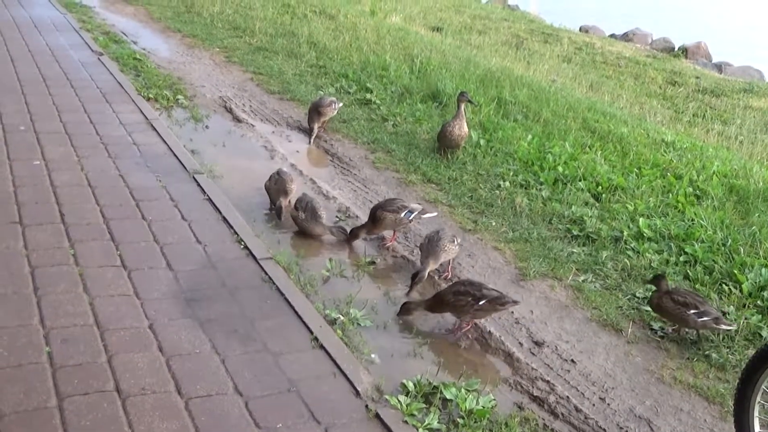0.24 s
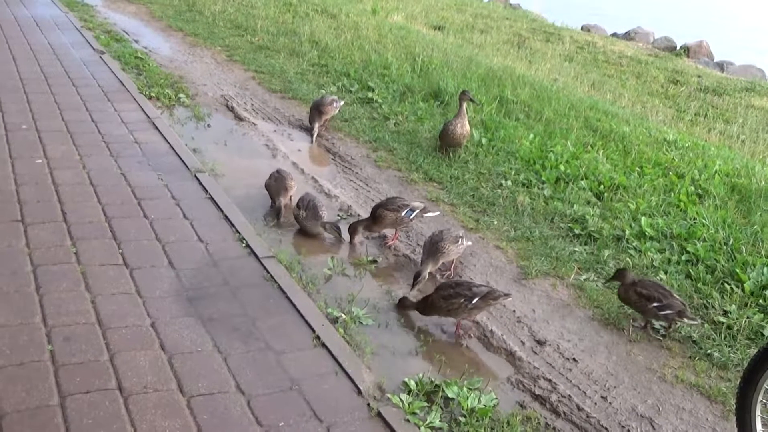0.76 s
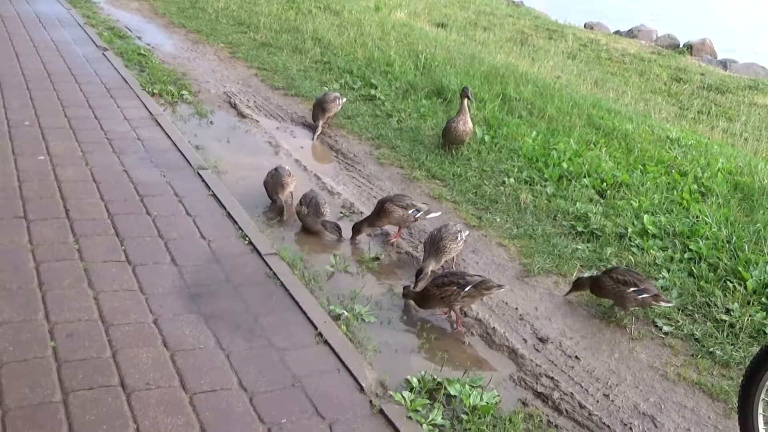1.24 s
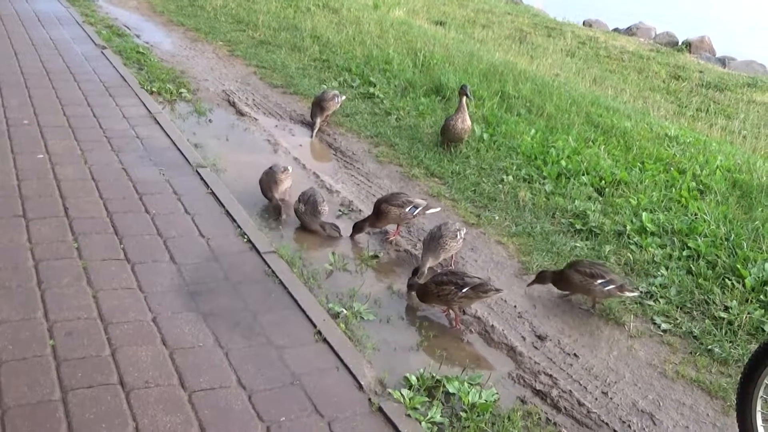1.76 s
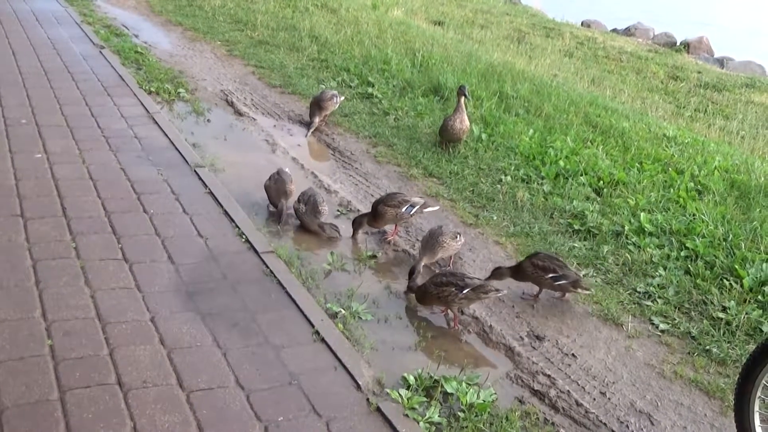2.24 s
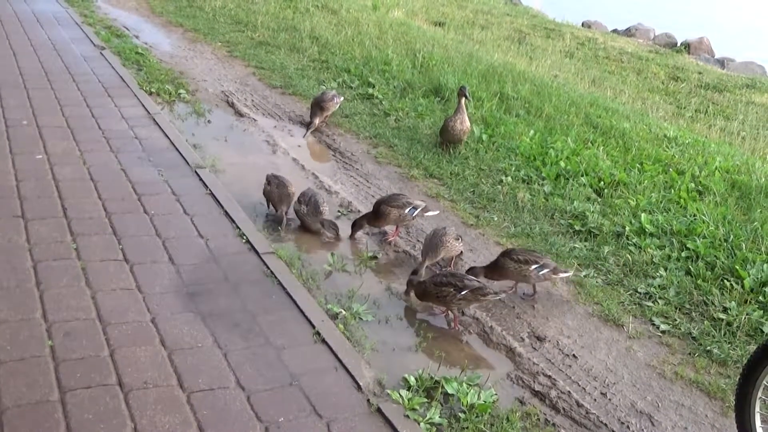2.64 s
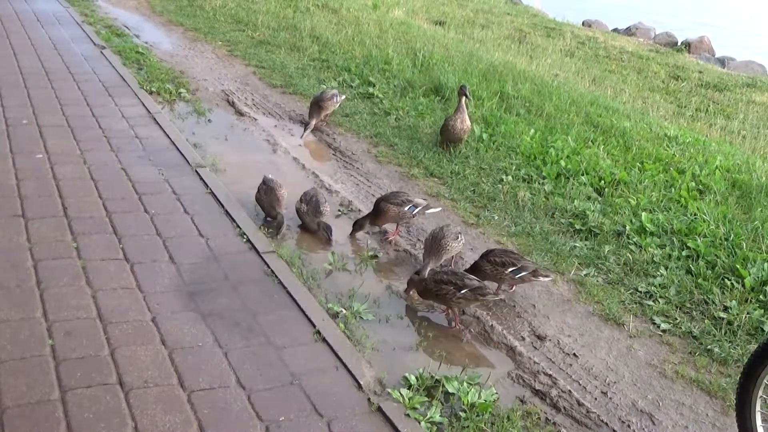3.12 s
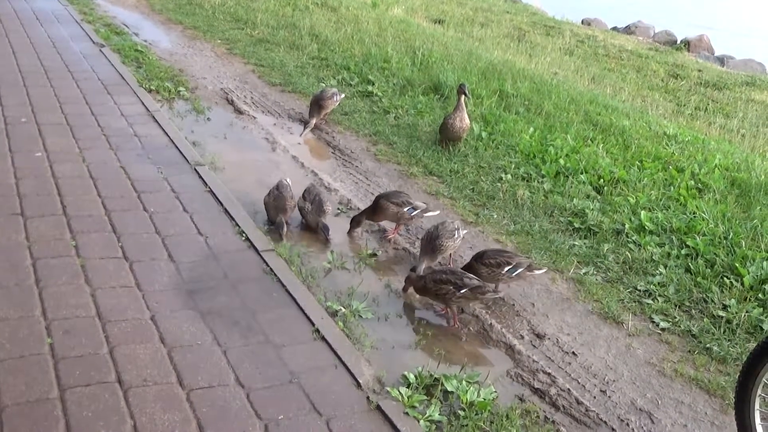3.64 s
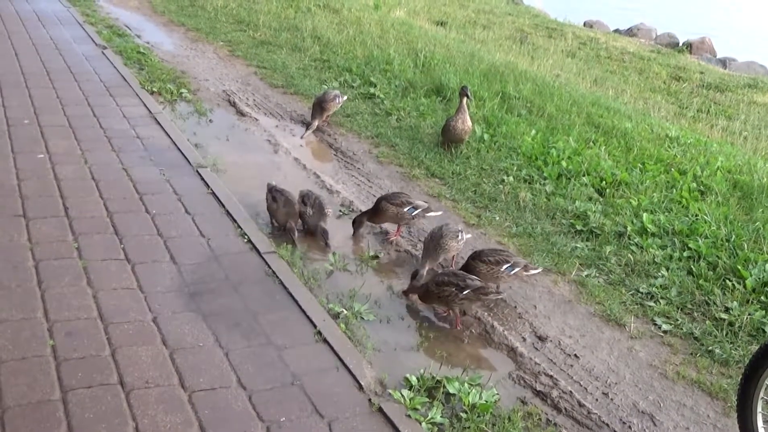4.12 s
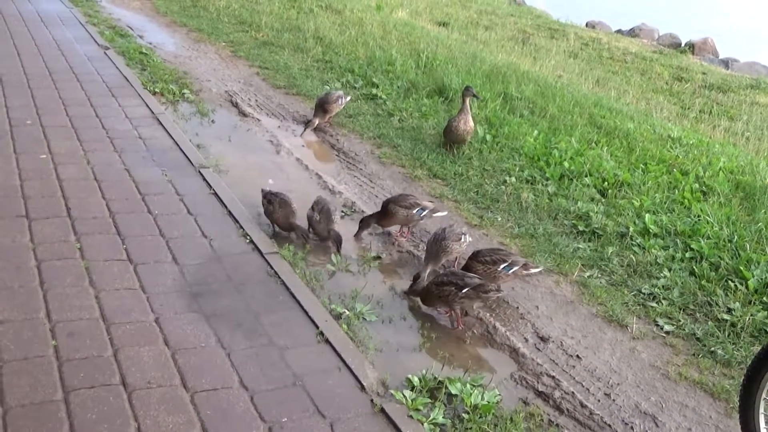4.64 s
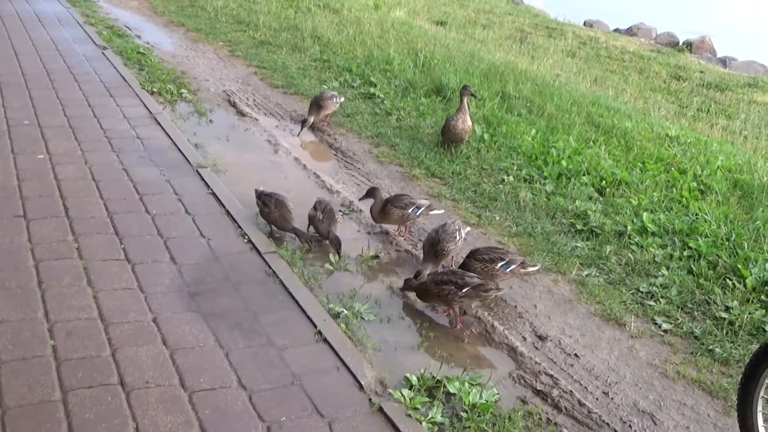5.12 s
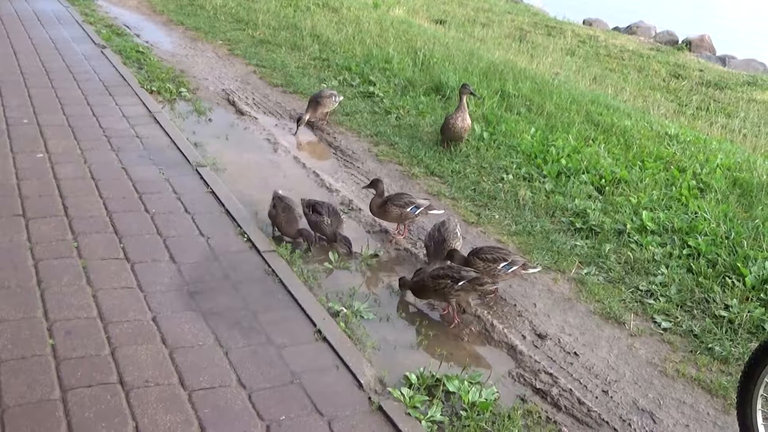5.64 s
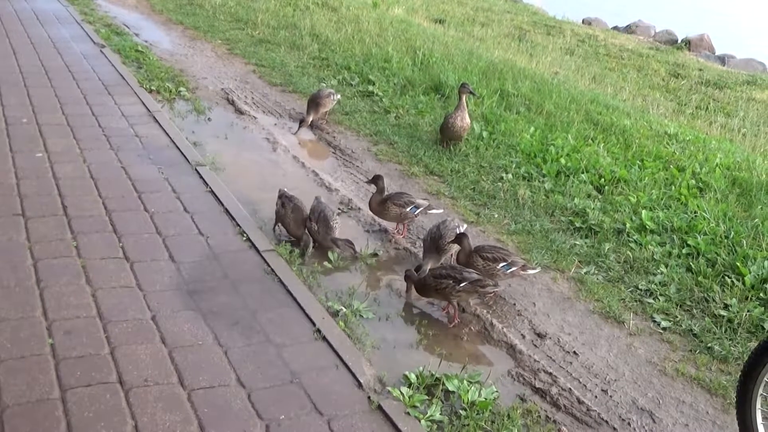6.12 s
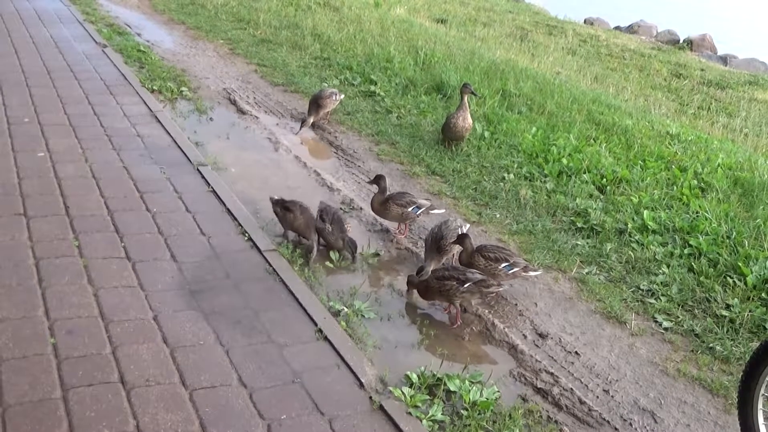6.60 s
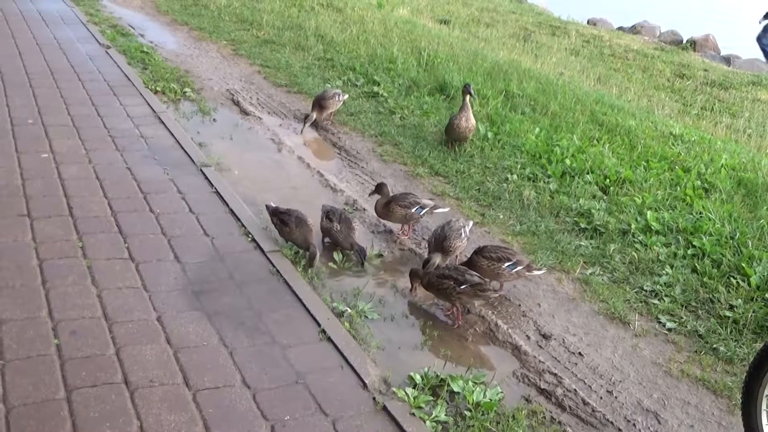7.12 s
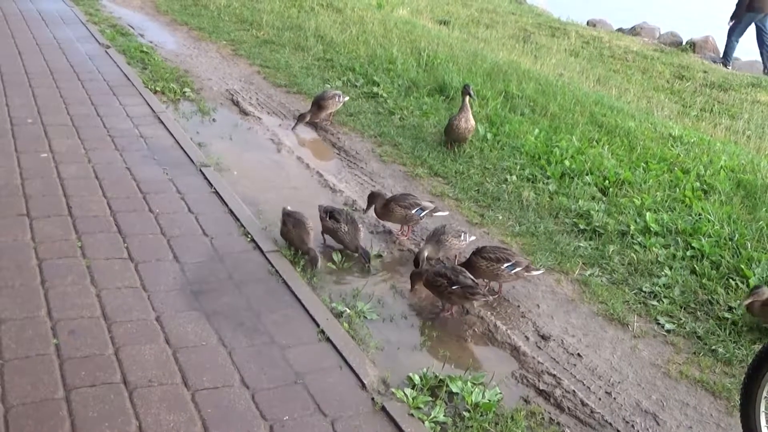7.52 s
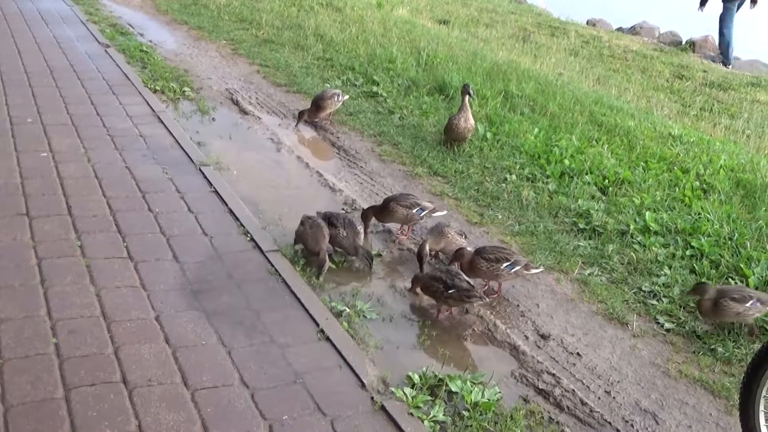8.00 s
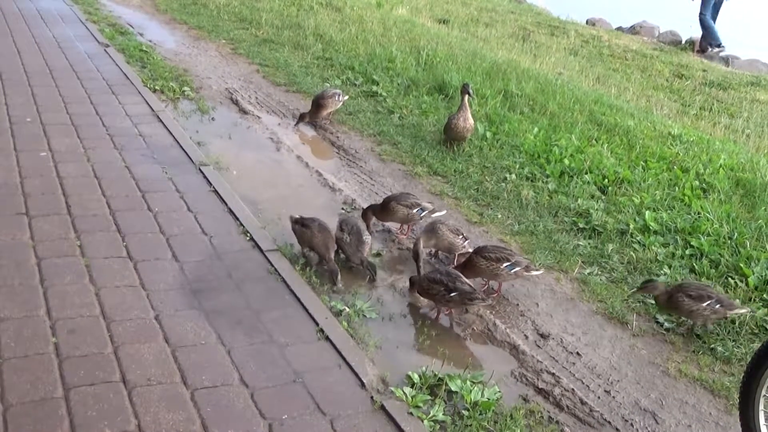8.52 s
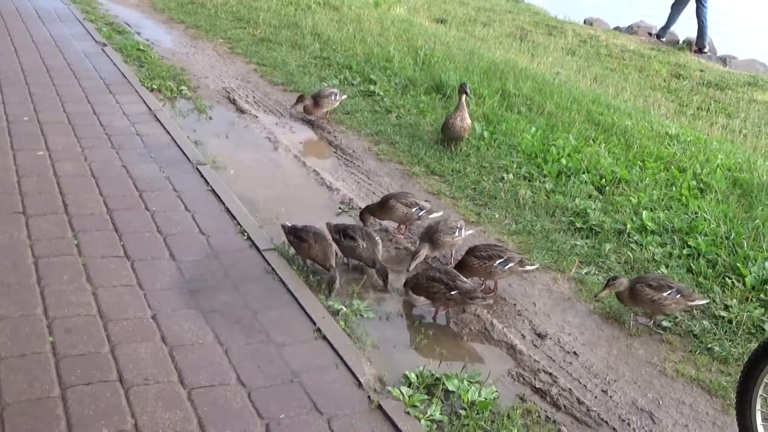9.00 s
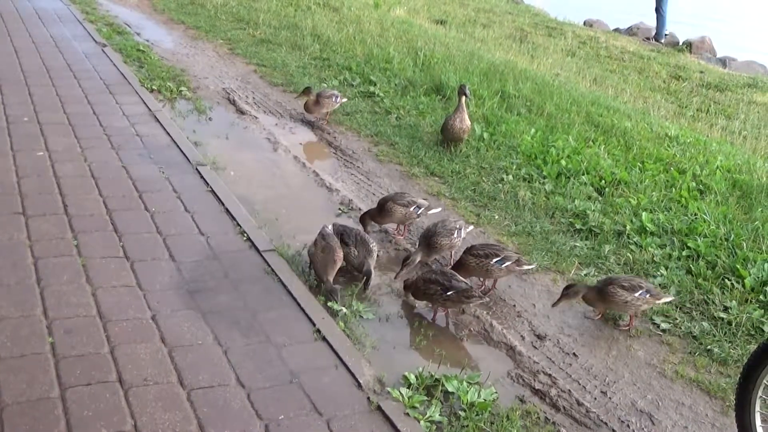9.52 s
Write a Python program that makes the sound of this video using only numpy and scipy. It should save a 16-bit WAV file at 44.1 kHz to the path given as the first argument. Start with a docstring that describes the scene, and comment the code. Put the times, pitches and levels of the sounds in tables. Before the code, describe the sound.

Ducks dabble in a muddy puddle, bills making rapid wet clicks and smacks, with tiny bubble plops and soft short peeps over faint open-air wash.

```python
"""On a lakeside path, ducks dabble in a rain puddle a few metres away.
Their bills click, smack and tick: bursts of crackling noise shaped by small wet hollows, some with a ringing bubble.
Bubbles and drips are short, fading tones. The ducks' soft peeps are wavering tones that arch or slide in pitch.
Underneath lie an open-air wash of coloured noise, nearly steady, and a faint hum of narrow-band noise."""
import sys
import numpy as np
from scipy import signal
from scipy.fft import rfft, irfft, next_fast_len
from scipy.io import wavfile
from scipy.ndimage import uniform_filter1d

SR = 44100
rng = np.random.default_rng(int(sys.argv[2]) if len(sys.argv) > 2 else 0)


def wav_out(sig):
    """Save sig, one row per channel (or a flat mono array), as 16-bit PCM at SR to the path in sys.argv[1]."""
    wavfile.write(sys.argv[1], SR, np.round(np.clip(np.atleast_2d(sig).T, -1, 1) * 32767).astype(np.int16))


N = 429975  # length of the scene in samples


def amp(db):
    """Turns decibels into a plain multiplier."""
    return 10 ** (np.asarray(db) / 20)


def evened(x):
    """Scales a sound to an average (rms) level of 1."""
    return x / np.sqrt(np.mean(x ** 2) + 1e-20)


def read(points, hz):
    """Reads a spectrum between its points, on a log-frequency axis."""
    f, value = np.transpose(points)
    return np.interp(np.log(hz + 1), np.log(f + 1), value)


def coloured(x, points):
    """Filters a sound by a spectrum in dB."""
    size = next_fast_len(len(x))
    gain = amp(read(points, np.fft.rfftfreq(size, 1 / SR)))
    return irfft(rfft(x, size) * gain, size)[:len(x)]


def add(mix, s, sound):
    """Mixes a sound in at time s (seconds), cutting off what runs past the end."""
    part = mix[max(round(s * SR), 0):][:len(sound)]
    part += sound[:len(part)]


def between(low, high, share):
    """A value between two others on a log scale; share runs from 0 to 1."""
    return low * (high / low) ** share


def air(level_db=-55, swell_db=-0.82):
    """Distant outdoor wash: coloured noise whose level drifts very slightly."""
    # Tone colour of the wash. Each row: frequency in Hz, relative level in dB.
    wash_colour = [(25, -33), (60, -13), (145, -6.5), (250, 1.5), (330, 0.5), (440, -3), (540, -3.5),
                   (760, 2.5), (1100, -1), (1600, -2), (2900, -5), (3600, -7.5), (6200, -11.5), (9700, -11),
                   (12300, -20), (16000, -24)]
    knots = np.linspace(0, N, 30)
    swell = np.interp(np.arange(N), knots, rng.standard_normal(len(knots)))
    wash = evened(coloured(rng.standard_normal(N), wash_colour))
    return amp(level_db + swell_db * swell) * wash


def drone(hz=346, width_hz=14, drone_db=-77):
    """A faint far-off hum: noise in so narrow a band that it sounds like a wavering tone."""
    f = np.fft.rfftfreq(N, 1 / SR)
    band = 1 / (1 + ((f - hz) / width_hz) ** 2)
    return amp(drone_db) * evened(irfft(rfft(rng.standard_normal(N)) * band, N))


def cavity(hz, q, size=1024):
    """Response of the small wet hollow between bill and mud: a resonance that never sounds early."""
    # Tone colour shared by all bill smacks. Each row: frequency in Hz, gain in dB.
    bill_colour = [(300, -0.5), (700, 4), (1500, 4), (2900, 4.5), (3450, -2.5), (4400, -1), (6200, -3.5),
                   (6800, 1.5), (7800, 0.5), (9900, 6.5), (12000, -4.5), (15500, -15.5)]
    f = np.fft.rfftfreq(size, 1 / SR) + 1
    resonance = 1 / (1 + (q * (f / hz - hz / f)) ** 2)
    log_gain = np.log(amp(read(bill_colour, f)) * resonance + 1e-4)
    # folding the cepstrum onto positive times makes the response minimum-phase
    cepstrum = irfft(log_gain)
    cepstrum[1:size // 2] *= 2
    cepstrum[size // 2 + 1:] = 0
    return np.exp(rfft(cepstrum))


def droplet(t, hz, ring_db=-5, cycles=7.3, lift=0.039):
    """A trapped bubble rings for a few cycles, rising a little in pitch."""
    age = t * hz / cycles
    rising_hz = hz * (1 + lift * np.tanh(age))
    tone = np.sin(2 * np.pi * np.cumsum(rising_hz) / SR)
    return amp(ring_db) * evened(tone * np.sqrt(age) * np.exp(-age))


def smack(hz, q, length, snap=2.54, onset=0.27, droplet_q=1.8, size=1024):
    """A water film parts and crackles away into the cavity; its energy is that of 1 ms at rms level 1."""
    t = np.arange(size) / SR
    decay = max(length, 1e-4)
    grit = evened(rng.standard_normal(size) * rng.exponential(1, size) ** 2)
    crackle = grit * np.exp(-t / decay) * (1 - np.exp(-t / (onset * decay)))
    crackle[0] += snap  # the film snaps
    sound = evened(irfft(rfft(crackle) * cavity(hz, q)))
    if q > droplet_q:  # a tight hollow also traps a bubble
        sound = sound + droplet(t, hz)
    return evened(sound) * np.sqrt(SR / 1000 / size)


def effort_db(s, usual_db=-55.5):
    """How far the feeding is above its unhurried level at time s."""
    # How hard the flock feeds. Each row: time in seconds, level of the dabbling in dB.
    feeding = [(0.0, -56.5), (0.71, -54), (0.84, -54), (1.6, -55.5), (2.33, -53), (2.55, -53), (3.47, -51),
               (3.83, -55.5), (4.02, -52), (4.91, -58.5), (5.32, -54.5), (6.38, -54), (6.76, -58.5),
               (7.96, -57.5), (8.12, -53), (8.28, -54), (9.01, -57.5), (9.75, -53)]
    return np.interp(s, *np.transpose(feeding)) - usual_db


def patter(level_db, follow, low_hz, high_hz, per_s, spread_db, q, length, count=28):
    """Countless tiny smacks, each kind with its own cavity; a few are much larger than the rest."""
    out = np.zeros(N)
    seconds = N / SR
    for hz in np.geomspace(low_hz, high_hz, count):
        grain = smack(hz, q * rng.uniform(0.49, 2.1), length * rng.uniform(0.29, 2.3))
        when, chance, luck = rng.random((3, 400))
        heard = chance < per_s * seconds / count / len(chance)
        size_db = spread_db * np.minimum(-np.log(luck), 3)  # mostly small, seldom large
        for s, db in zip(when[heard] * seconds, size_db[heard]):
            # follow: dB of level for each dB of feeding effort
            add(out, s, amp(level_db + db + follow * effort_db(s)) * grain)
    return out


def dabbling():
    """Water slurps through the bills; mud ticks higher up. Both grow louder with the feeding."""
    slurps = patter(level_db=-58.0, follow=1.4, low_hz=1030, high_hz=4620,
                    per_s=240, spread_db=3.0, q=1.26, length=0.0012)
    ticks = patter(level_db=-60.0, follow=0.67, low_hz=3770, high_hz=13100,
                   per_s=130, spread_db=4.5, q=1.3, length=0.0018)
    return slurps + ticks


def plop(hz, swell_s=0.00081):
    """A pocket of air swells and rings for a few cycles in the water."""
    t = np.arange(SR // 50) / SR
    swell = t / swell_s * np.exp(1 - t / swell_s)
    ring = swell * np.sin(2 * np.pi * hz * t)
    return np.gradient(ring) * SR / (2 * np.pi * hz)  # only changing flow radiates


def plops(plop_db=3.5):
    """The loudest bubbles in the puddle, each a ringing pocket of air."""
    # Each row: start in seconds, level in dB before the shared boost plop_db, pitch in Hz.
    bubbles = [(0.017, -43, 2820), (0.1354, -41, 3030), (0.4956, -39.5, 2110), (0.842, -45, 2550),
               (1.044, -47, 2100), (1.1805, -42.5, 2740), (1.6133, -39, 1730), (1.706, -42.5, 3080),
               (1.841, -43, 2830), (1.978, -44, 2830), (2.609, -42, 1600), (2.959, -42, 1760),
               (3.197, -39, 1700), (3.9357, -39.5, 2760), (4.02, -45, 3000), (4.146, -42.5, 3000),
               (4.261, -44, 1150), (4.318, -47, 730), (5.096, -40, 775), (5.992, -46, 3050),
               (6.148, -40, 3000), (6.35, -44, 3300), (6.716, -37.5, 4300), (7.037, -42, 2800),
               (7.172, -40.5, 720), (7.172, -46, 480), (8.1045, -38, 1450), (8.158, -42.5, 2450),
               (8.339, -43, 2130), (8.571, -49, 520), (9.197, -41.5, 2840), (9.6536, -41, 4370)]
    out = np.zeros(N)
    for s, db, hz in bubbles:
        add(out, s, amp(db + plop_db) * plop(hz))
    return out


def froth(length, froth_db=-12, full_s=0.007, linger=2.8, low_hz=1500, high_hz=10000,
          burst_s=0.0004, count=8):
    """The longer a smack, the more small bubbles burst in its wake, each at its own pitch."""
    out = np.zeros(SR // 10)
    for chance, delay, small in rng.random((count, 3)):
        if chance < length / full_s:
            bubble = plop(between(low_hz, high_hz, small), burst_s)
            add(out, linger * length * delay, amp(froth_db) * bubble)
    return out


def bills(click_db=-0.47):
    """The distinct clicks of the nearest bills: water films part in wet hollows, leaving froth."""
    # The loudest clicks. Each row: start in seconds, energy level in dB before the shared trim click_db,
    # cavity pitch in Hz, cavity sharpness Q (no unit), fading time in seconds (at least 0.0001 is used).
    clicks = [(0.0181, -39.5, 5700, 0.25, 0.0011), (0.0368, -40, 5500, 0.22, 0.0028),
              (0.1354, -37, 2060, 0.21, 0.0021), (0.203, -30, 8000, 0.15, 0.00094),
              (0.214, -36, 11500, 0.65, 0.0003), (0.348, -39, 4600, 1.2, 0.0005),
              (0.371, -37.5, 4800, 0.3, 0.0005), (0.491, -37, 6500, 3, 0.0012),
              (0.763, -38.5, 4000, 0.75, 0.00083), (0.788, -36.5, 11000, 1.3, 0.0007),
              (0.839, -37, 4070, 0.23, 0.0022), (0.9, -39.5, 4570, 3, 0.0006),
              (1.066, -45, 6800, 4.4, 0.0006), (1.161, -38.5, 4800, 1.7, 0.0015),
              (1.217, -40.5, 11500, 0.24, 0.00097), (1.291, -41, 6900, 2.7, 0.00072),
              (1.371, -37, 2840, 4.5, 0.0025), (1.423, -36, 2450, 1.8, 0.00078),
              (1.441, -38, 8450, 2.4, 0.0005), (1.528, -42, 8180, 3, 0.0005),
              (1.612, -43, 1900, 0.5, 0.0015), (1.693, -45, 6600, 1, 0.00024),
              (1.708, -28, 6690, 0.4, 0.0027), (1.842, -39, 2100, 0.52, 0.0012),
              (1.937, -40, 4200, 1, 0.00056), (2.04, -36.5, 10300, 4.3, 0.00054),
              (2.2203, -28, 5800, 0.33, 0.00098), (2.403, -40, 2100, 0.26, 0.0018),
              (2.4097, -33, 1750, 0.35, 0.0021), (2.4499, -34, 2580, 1.3, 0.00058),
              (2.4667, -38, 4400, 1.7, 0.00094), (2.544, -41.5, 4000, 1.4, 0.0014),
              (2.606, -34.5, 3100, 0.18, 0.0058), (2.62, -39, 7200, 2.2, 0.0006),
              (2.665, -30, 6200, 1.7, 0.0023), (2.698, -31, 4660, 0.29, 0.0035),
              (2.8112, -39, 11500, 0.72, 0.001), (2.8674, -20.5, 7660, 0.16, 0.0024),
              (2.964, -33, 6110, 0.29, 0.0014), (2.982, -39, 6000, 1, 0.0011),
              (3.011, -32.5, 4260, 0.18, 0.0037), (3.0254, -37.5, 4200, 1.1, 0.0004),
              (3.09, -32.5, 8390, 0.58, 0.0035), (3.119, -41, 10400, 3, 0.0007),
              (3.13, -39, 2500, 0.3, 0.0014), (3.137, -31, 8700, 1.9, 0.0005),
              (3.14, -37, 3000, 0.3, 0.0012), (3.147, -35, 9200, 1.2, 0.0045),
              (3.185, -41, 5500, 0.5, 0.001), (3.1898, -29, 3300, 0.15, 0.0032),
              (3.199, -37, 6700, 4, 0.001), (3.2073, -31, 9300, 3.5, 0.0005), (3.21, -30, 5800, 4.4, 0.002),
              (3.214, -37, 9500, 1, 0.003), (3.239, -39, 5700, 1.2, 0.0014), (3.253, -34, 2830, 0.2, 0.005),
              (3.295, -32, 2400, 0.43, 0.00072), (3.312, -22.5, 7540, 1.3, 0.0014),
              (3.372, -29.5, 7100, 1.9, 0.0013), (3.4355, -25.5, 9500, 0.98, 0.0014),
              (3.4947, -40.5, 4800, 2.5, 0.0008), (3.499, -31.5, 9100, 0.9, 0.0007),
              (3.504, -27.5, 7950, 0.91, 0.0039), (3.5094, -29.5, 8000, 0.9, 0.0012),
              (3.5225, -35, 4800, 1.7, 0.0012), (3.5523, -35.5, 7200, 0.78, 0.00096),
              (3.6057, -23.5, 7500, 1, 0.0022), (3.61, -32, 6000, 0.2, 0.0009),
              (3.64, -39, 6900, 8, 0.0012), (3.662, -36, 6900, 2.8, 0.0007),
              (3.722, -30, 4400, 0.47, 0.0014), (3.7665, -37, 6000, 0.34, 0.0023),
              (3.8005, -31.5, 10500, 0.27, 0.0014), (3.8798, -16.5, 9300, 2.5, 0.00017),
              (3.933, -34, 9800, 2.3, 0.00099), (3.986, -33, 9250, 4.2, 0.00054),
              (4.002, -35, 4660, 0.21, 0.0082), (4.0479, -36.5, 4980, 0.3, 0.0012),
              (4.078, -36, 2300, 0.41, 0.001), (4.083, -41, 10080, 3, 0.0005),
              (4.104, -40, 2500, 1.2, 0.001), (4.109, -28, 9000, 3.7, 0.0012),
              (4.134, -37, 6600, 0.18, 0.0022), (4.1704, -30.5, 6830, 4, 0.0027),
              (4.198, -28.5, 5580, 0.28, 0.001), (4.259, -39, 1800, 0.18, 0.002),
              (4.261, -37, 5170, 4.5, 0.001), (4.373, -34, 1800, 0.16, 0.0017),
              (4.702, -36.5, 4450, 0.2, 0.0015), (4.734, -35, 8950, 1.6, 0.00051),
              (4.81, -35.5, 3720, 0.15, 0.0045), (4.928, -36, 1500, 0.25, 0.0028),
              (4.992, -36, 4660, 1.3, 0.0019), (5.0165, -44, 4300, 4, 0.0009),
              (5.117, -35.5, 4260, 0.33, 0.0026), (5.1547, -31, 4160, 1.8, 0.00088),
              (5.337, -36.5, 5240, 1.5, 0.0019), (5.4655, -42, 4940, 0.75, 0.00058),
              (5.472, -40.5, 4800, 4.5, 0.0008), (5.519, -34.5, 1890, 0.35, 0.00084),
              (5.585, -38, 2100, 0.79, 0.0008), (5.6224, -42.5, 6980, 4, 0.0007),
              (5.69, -30, 8950, 1.7, 0.00023), (5.71, -34.5, 5300, 1.3, 0.0025),
              (5.723, -36, 6300, 0.6, 0.00058), (5.743, -36.5, 9600, 0.18, 0.0012),
              (5.8079, -39.5, 2600, 0.19, 0.0018), (5.903, -34.5, 8390, 0.53, 0.00053),
              (5.9914, -43, 3300, 0.49, 0.0013), (6.035, -38.5, 5580, 0.61, 0.0051),
              (6.095, -38, 7940, 2.1, 0.0016), (6.128, -39, 1500, 0.38, 0.0012),
              (6.202, -37.5, 5840, 1.8, 0.0017), (6.367, -34.5, 9700, 0.86, 0.00033),
              (6.446, -32, 6460, 2.9, 0.0013), (6.5073, -36, 3100, 0.37, 0.0016),
              (6.514, -38, 10200, 2.4, 0.0005), (6.5527, -40, 5550, 1.8, 0.0012),
              (6.57, -36.5, 10050, 1.2, 0.0025), (6.717, -32, 6450, 0.98, 0.0014),
              (6.776, -33, 8950, 1.7, 0.0027), (7.032, -29, 9700, 2.1, 0.0011),
              (7.0375, -35.5, 5840, 0.38, 0.0025), (7.232, -39.5, 4600, 1, 0.0017),
              (7.258, -36.5, 11500, 0.3, 0.0013), (7.3633, -27.5, 6160, 0.86, 0.0005),
              (7.366, -27, 7500, 2, 0.0022), (7.396, -30, 7800, 6, 0.0017),
              (7.4685, -33.5, 8150, 4.2, 0.0019), (7.767, -38.5, 4000, 2.3, 0.0006),
              (7.858, -37.5, 6900, 5.4, 0.0012), (7.928, -36.5, 6110, 0.47, 0.0014),
              (7.9844, -34, 7900, 3.4, 0.001), (8.038, -36, 9050, 1.6, 0.0027),
              (8.07, -41, 4500, 1.8, 0.001), (8.1, -30, 5500, 1.3, 0.00067),
              (8.1305, -32, 4300, 0.69, 0.0018), (8.226, -40.5, 3600, 1, 0.0007),
              (8.183, -39.5, 10500, 0.3, 0.001), (8.323, -36, 3600, 2.3, 0.0028),
              (8.396, -43, 4200, 2.2, 0.0011), (8.51, -40, 9300, 2.5, 0.0006),
              (8.553, -36.5, 2590, 0.17, 0.0058), (8.61, -37, 5200, 2.1, 0.0018),
              (8.902, -38.5, 10000, 3, 0.0013), (8.992, -39, 4400, 1.2, 0.0023),
              (9.357, -35.5, 6690, 0.21, 0.0025), (9.3993, -37, 11500, 0.92, 0.0003),
              (9.435, -32.5, 3400, 0.62, 0.0015), (9.543, -38.5, 3300, 1.7, 0.0012),
              (9.5605, -39.5, 7900, 1.4, 0.0007), (9.6237, -29.5, 7940, 0.35, 0.0019),
              (9.6496, -39, 8780, 4, 0.0006)]
    out = np.zeros(N)
    for s, db, hz, q, length in clicks:
        add(out, s, amp(db + click_db) * smack(hz, q, length))
        add(out, s, amp(db) * froth(length))
    return out


def moments(per_s, follow, count=1500):
    """Random times, each with three random shares 0-1; follow above 0 crowds them when feeding is harder."""
    rows = rng.random((count, 5))
    s = rows[:, 0] * N / SR
    rate = per_s * amp(follow * effort_db(s))
    happens = rows[:, 1] < rate * N / SR / count
    return np.column_stack([s, rows[:, 2:]])[happens]


def nibbles(per_s=11, follow=0.8, nibble_db=-46, range_db=4, low_hz=3000, high_hz=11500,
            dull_q=0.46, sharp_q=3.2, long_s=0.0033, short_s=0.00056):
    """Softer bill clicks: smaller hollows sound higher and tend to be purer and shorter."""
    out = np.zeros(N)
    for s, strength, small, shape in moments(per_s, follow):
        tight = (small + shape) / 2
        hz = between(low_hz, high_hz, small)
        click = smack(hz, between(dull_q, sharp_q, tight), between(long_s, short_s, tight))
        add(out, s, amp(nibble_db + range_db * (strength + 0.5)) * click)
    return out


def gurgles(per_s=6, follow=1.6, gurgle_db=-49, range_db=5, low_hz=1200, high_hz=4600,
            gap_s=0.009, count=3):
    """Water drips off a lifted bill in short runs of little ringing bubbles."""
    out = np.zeros(N)
    for s, strength, *_ in moments(per_s, follow):
        for k, (delay, small) in enumerate(rng.random((count, 2))):
            drip = plop(between(low_hz, high_hz, small), swell_s=0.0006)
            add(out, s + gap_s * (k + delay), amp(gurgle_db + range_db * strength) * drip)
    return out


def peep(length, pitches, waver=0.016, second_db=-19, fullness=0.27, flutter_db=2.0,
         rough=0.29, echo_db=-12):
    """A thin, wavering, hoarse whistle gliding through three pitches, blurred by its bounce off the ground."""
    u = np.linspace(-1, 1, int(length * SR))
    # slow and faster random wobbles, made by smoothing noise
    jitter = evened(uniform_filter1d(rng.standard_normal(SR // 4), size=130))[:len(u)]
    rasp = evened(uniform_filter1d(rng.standard_normal(SR // 4), size=40))[:len(u)]
    hz = np.polyval(np.polyfit([-1, 0, 1], pitches, 2), u)  # a smooth curve through the pitches
    phase = 2 * np.pi * np.cumsum(hz * (1 + waver * jitter)) / SR
    tone = np.sin(phase) + amp(second_db) * np.sin(2 * phase)
    fade = signal.windows.cosine(len(u)) ** fullness
    effort = fade * amp(flutter_db * jitter)  # louder as the wavering lifts the pitch
    call = effort * tone * (1 + rough * rasp)
    lag = int(rng.uniform(0.001, 0.005035) * SR)  # the bounce comes 1 to 5 ms later
    return np.pad(call, (0, lag)) + amp(echo_db) * np.pad(call, (lag, 0))


def peeps(peep_db=-0.6):
    """Several ducks call in gliding whistles, often across one another."""
    # Each row: start in seconds, length in seconds (before the bounce), level in dB before the shared
    # trim peep_db, then the pitch at the start, in the middle and at the end in Hz (before wavering).
    calls = [(0.351, 0.04, -52, 950, 1110, 1650), (0.421, 0.046, -53.0, 1330, 1510, 1210),
             (0.434, 0.035, -58, 2260, 2320, 2080), (0.63, 0.043, -52, 1250, 1456, 1400),
             (0.807, 0.042, -49.5, 1310, 1560, 1340), (0.812, 0.05, -56, 2360, 2360, 2190),
             (0.85, 0.035, -55.5, 1640, 1680, 1470), (0.971, 0.06, -52, 1584, 1670, 1100),
             (0.985, 0.027, -55, 1660, 1870, 2150), (1.653, 0.048, -56, 3590, 3900, 3580),
             (1.698, 0.045, -52, 1416, 1550, 1390), (1.89, 0.037, -58, 1400, 1480, 1400),
             (2.089, 0.047, -46, 897, 1650, 1100), (2.379, 0.046, -48, 1040, 1606, 1140),
             (2.662, 0.069, -52, 1510, 1690, 1410), (2.857, 0.0345, -48, 1550, 1934, 2060),
             (3.361, 0.037, -47.5, 1397, 1365, 1130), (3.576, 0.04, -52.5, 1780, 1920, 1560),
             (4.036, 0.03, -49, 610, 1107, 1310), (4.061, 0.058, -49, 1310, 1480, 950),
             (4.145, 0.047, -52, 1750, 1850, 1350), (4.354, 0.052, -46.5, 1500, 1880, 1480),
             (4.566, 0.049, -52, 1595, 1850, 1510), (4.961, 0.024, -51, 1770, 2090, 2440),
             (5.145, 0.038, -48.5, 1520, 1620, 1510), (5.242, 0.04, -48, 1620, 1850, 1440),
             (5.492, 0.031, -50.0, 883, 1136, 1530), (5.794, 0.043, -54, 1384, 1560, 1350),
             (5.877, 0.031, -53, 1690, 1675, 1480), (5.968, 0.038, -53, 1280, 1405, 1330),
             (5.972, 0.035, -59, 2210, 2250, 2170), (6.07, 0.05, -49, 1550, 1840, 1470),
             (6.116, 0.055, -49.5, 987, 1150, 860), (6.16, 0.033, -53, 1300, 1420, 1440),
             (6.155, 0.04, -56, 2040, 2140, 2130), (6.298, 0.033, -50, 1740, 1670, 1430),
             (6.352, 0.04, -58, 2060, 2210, 2120), (6.353, 0.039, -53.0, 1250, 1410, 1220),
             (6.369, 0.045, -55, 930, 922, 750), (6.513, 0.042, -49.5, 1634, 1740, 1460),
             (6.88, 0.045, -60, 1780, 1600, 1570), (6.95, 0.033, -54.5, 1300, 1490, 1520),
             (7.053, 0.038, -53.5, 1500, 2020, 2170), (7.072, 0.035, -53.5, 1300, 1535, 1190),
             (7.17, 0.055, -58, 1364, 1850, 1120), (7.235, 0.088, -56, 1755, 2180, 2050),
             (7.258, 0.034, -50.5, 1455, 1470, 1260), (7.298, 0.053, -53.5, 1600, 1780, 1310),
             (7.428, 0.073, -56.5, 1920, 2160, 2240), (7.43, 0.052, -52.5, 1310, 1540, 1140),
             (7.53, 0.05, -48.5, 1500, 1950, 1270), (7.604, 0.063, -56, 1820, 2110, 2250),
             (7.612, 0.047, -50, 1430, 1580, 1330), (8.171, 0.046, -54, 940, 1003, 820),
             (8.276, 0.044, -50.5, 1680, 1696, 1300), (8.487, 0.053, -48, 1565, 1740, 1380),
             (8.549, 0.041, -55, 1550, 1540, 1240), (8.705, 0.042, -55, 1840, 1940, 1910),
             (9.458, 0.055, -53.5, 1680, 1630, 1300), (9.667, 0.064, -50.5, 1710, 2110, 1380),
             (9.69, 0.028, -59, 4300, 4120, 3700), (9.696, 0.037, -54, 930, 863, 940)]
    out = np.zeros(N)
    for s, length, db, *pitches in calls:
        add(out, s, amp(db + peep_db) * peep(length, pitches))
    return out


def far_peeps(per_s=4, far_db=-60.0, length=0.033, low_hz=1300, high_hz=2400, droop=0.161):
    """Fainter arched whistles from the rest of the flock, half lost in the wash."""
    out = np.zeros(N)
    for s, pitch, rise, fall in moments(per_s, follow=0):
        arch = 1 - droop * np.array([rise, 0, fall])  # lower at both ends
        add(out, s, amp(far_db) * peep(length, between(low_hz, high_hz, pitch) * arch))
    return out


def scatter(x, decay):
    """Brief scatter from paving, mud and grass: a noise tail that builds up, then fades."""
    t = np.arange(SR // 8) / SR
    tail = rng.standard_normal(len(t)) * np.sqrt(t) * np.exp(-t / decay)
    return signal.oaconvolve(x, tail / np.linalg.norm(tail))[:N]


def scene(scatter_db=-17, spread_db=-5, left_db=0.5):
    """The ducks are nearly straight ahead; side sound, opposite in the two ears, widens wash and scatter."""
    # Stereo width. Each row: frequency in Hz, gain of the side sound in dB.
    width = [(30, -11), (70, -15), (180, -29.5), (380, -13.5), (700, -10), (2400, -7.5), (4400, -5.5),
             (8100, -9.5), (15000, -39)]
    ducks = bills() + nibbles() + gurgles() + dabbling() + peeps() + far_peeps() + plops()
    mid = ducks + amp(scatter_db) * scatter(ducks, decay=0.0062) + air() + drone()
    spread = amp(spread_db) * scatter(ducks, decay=0.003)
    side = coloured(air() + spread, width)
    left = (mid + side) * amp(left_db / 2)  # left ends up louder than right by left_db
    right = (mid - side) * amp(-left_db / 2)
    return np.array([left, right])


def record(dry, edge_hz=16000):
    """Takes away the treble above edge_hz with a steep low-pass filter."""
    low_pass = signal.firwin(255, edge_hz, window=("kaiser", 8), fs=SR)
    return signal.oaconvolve(dry, low_pass[None], "same")


dry = scene()
out = record(dry)
wav_out(out)
```